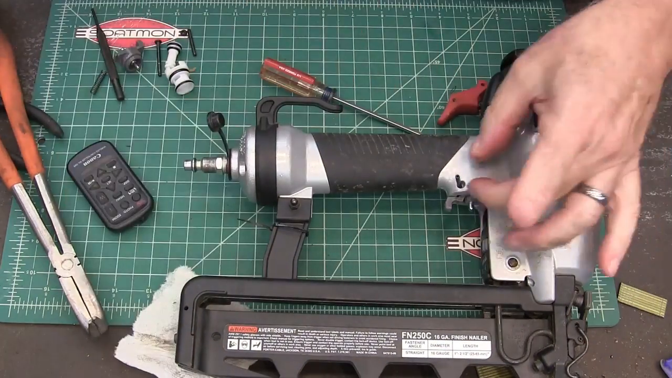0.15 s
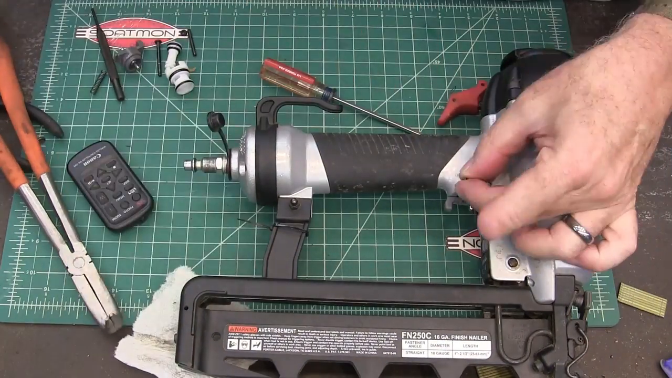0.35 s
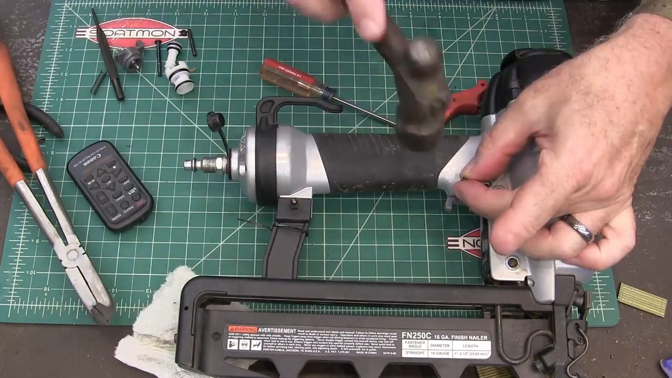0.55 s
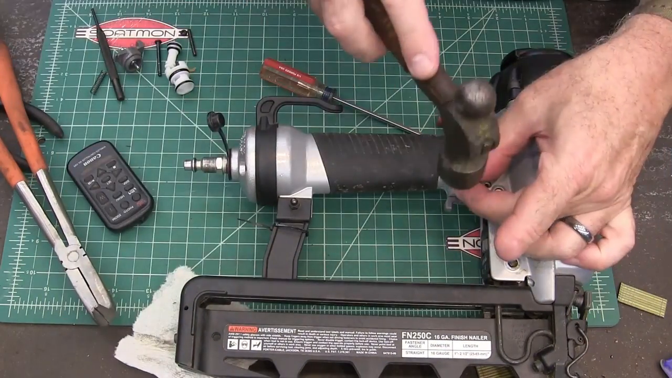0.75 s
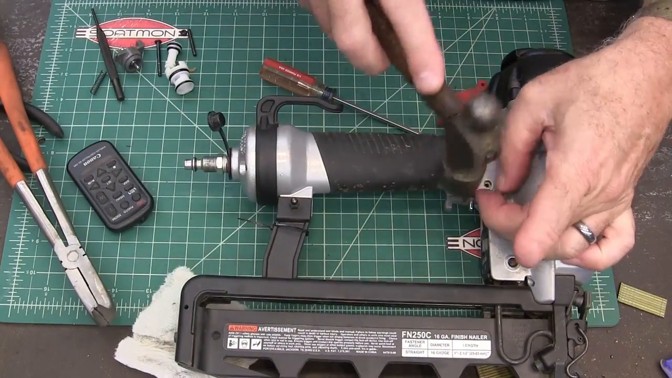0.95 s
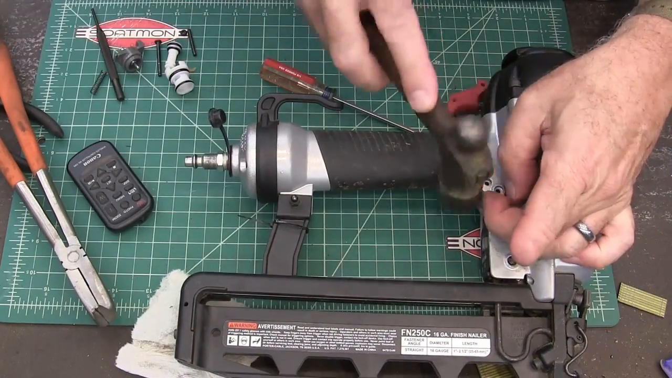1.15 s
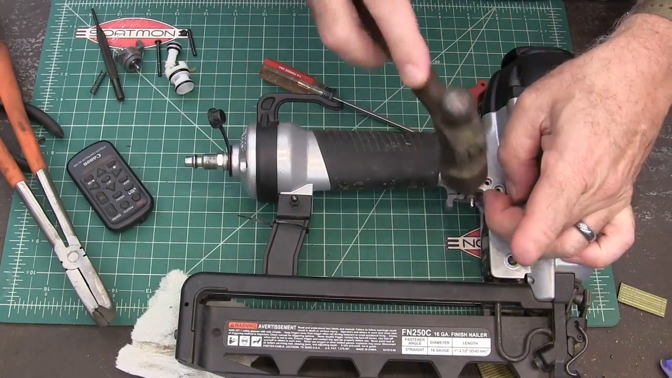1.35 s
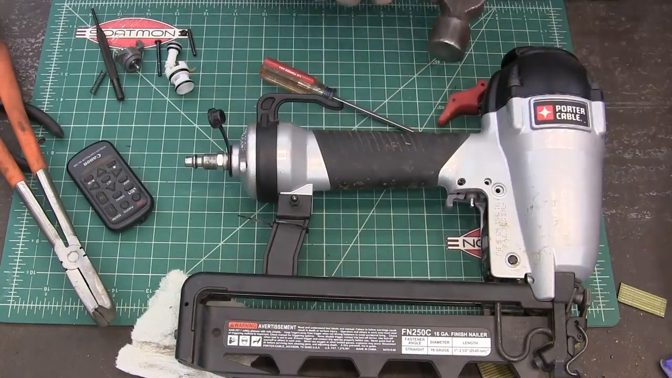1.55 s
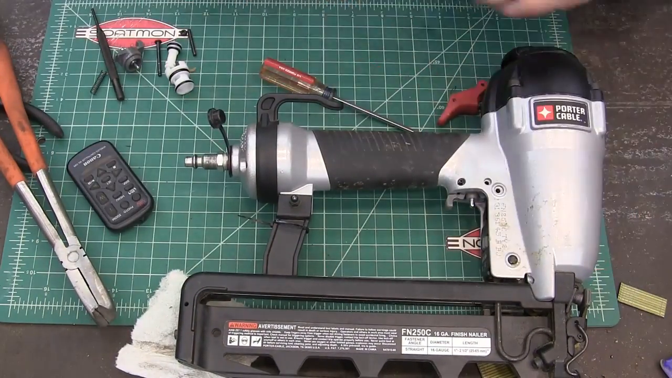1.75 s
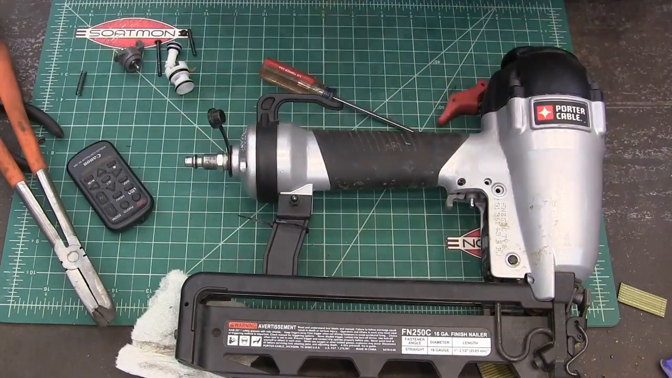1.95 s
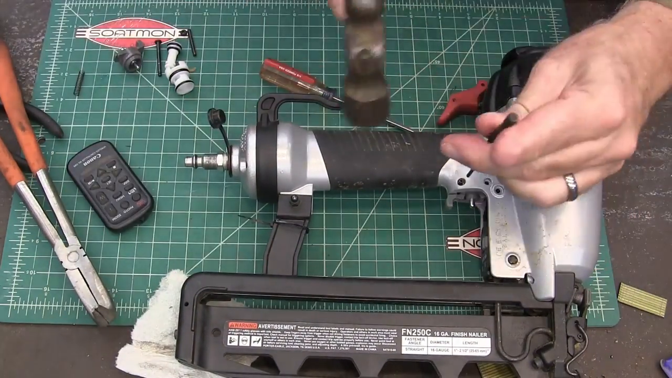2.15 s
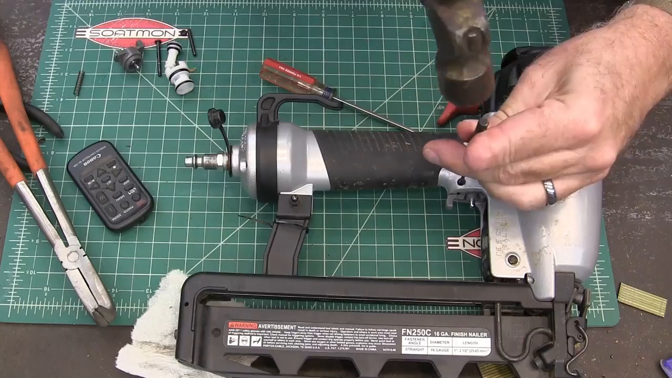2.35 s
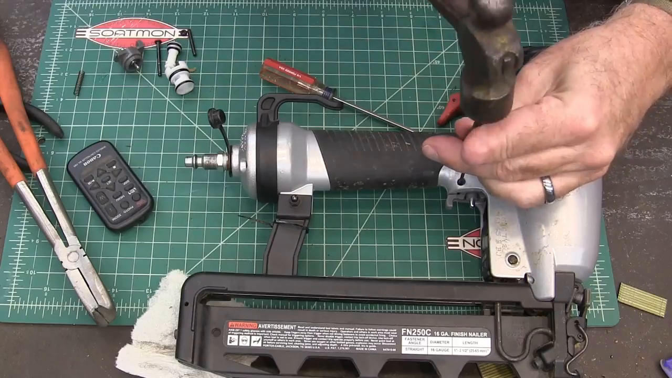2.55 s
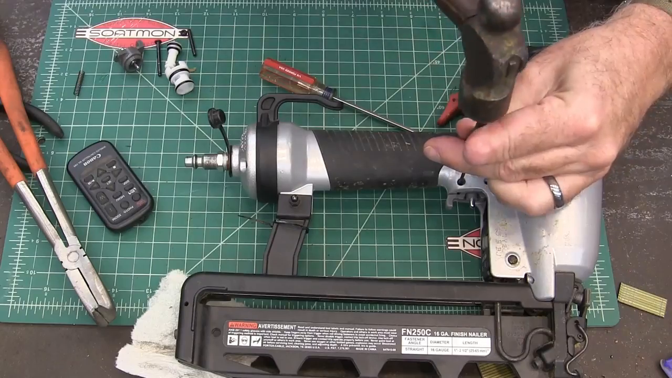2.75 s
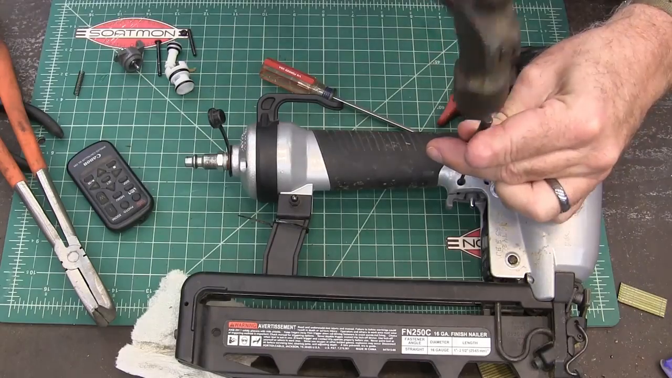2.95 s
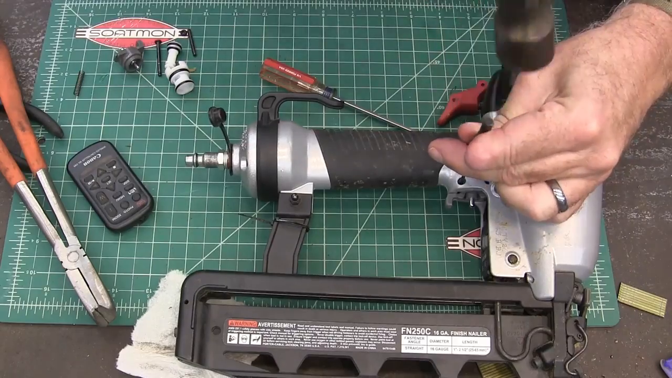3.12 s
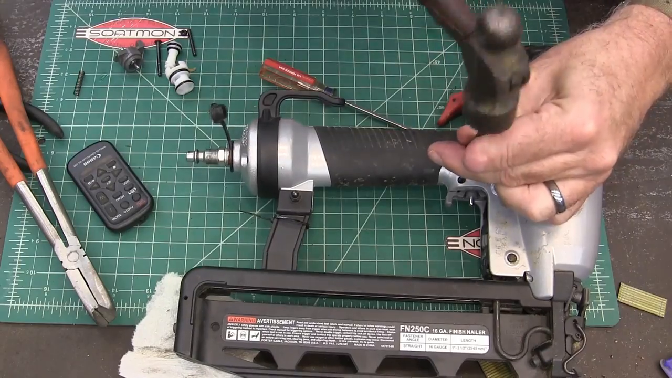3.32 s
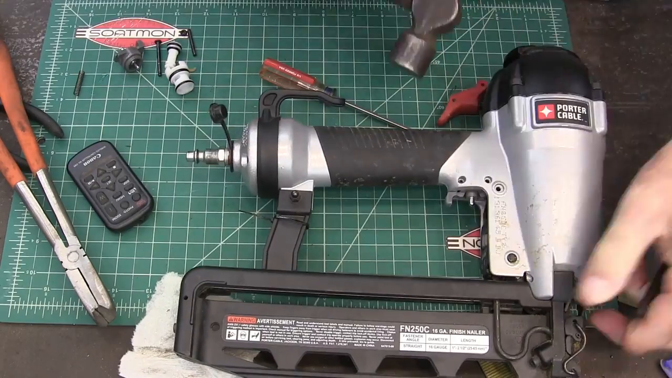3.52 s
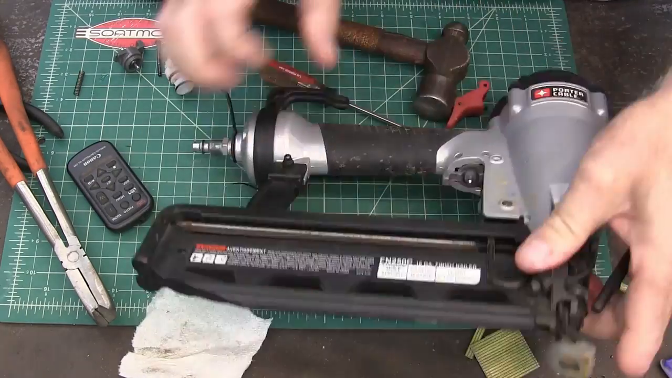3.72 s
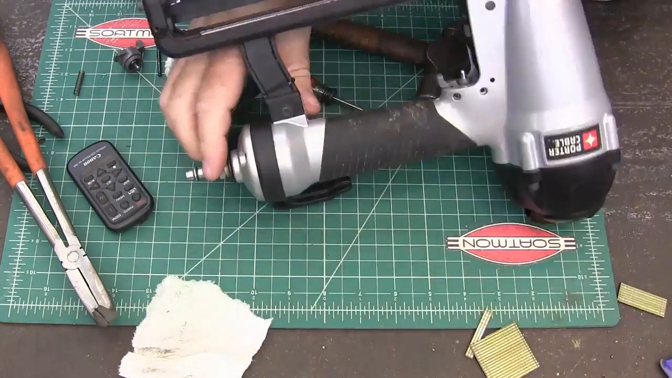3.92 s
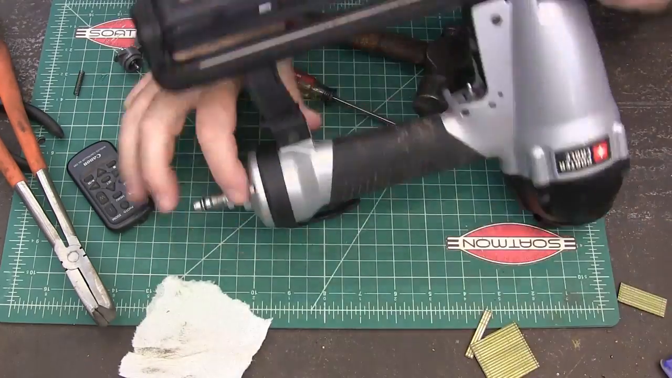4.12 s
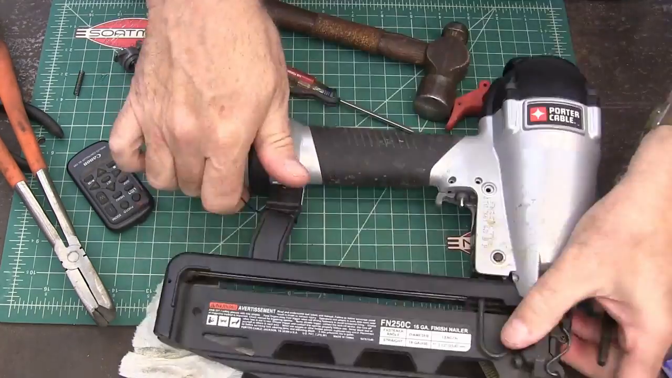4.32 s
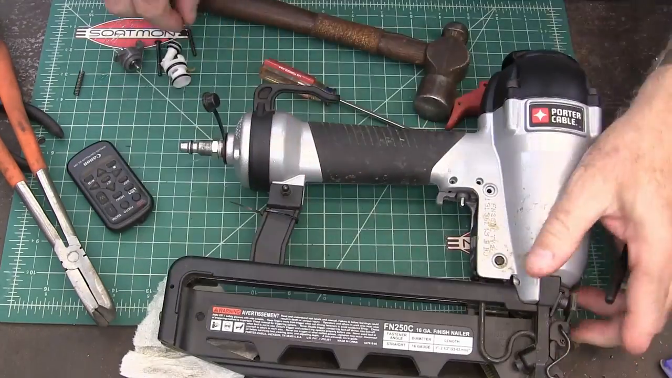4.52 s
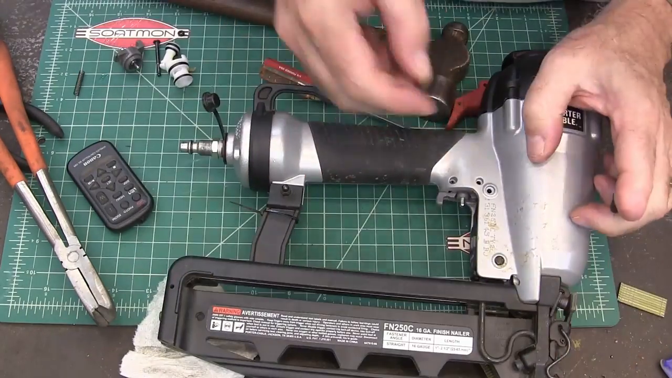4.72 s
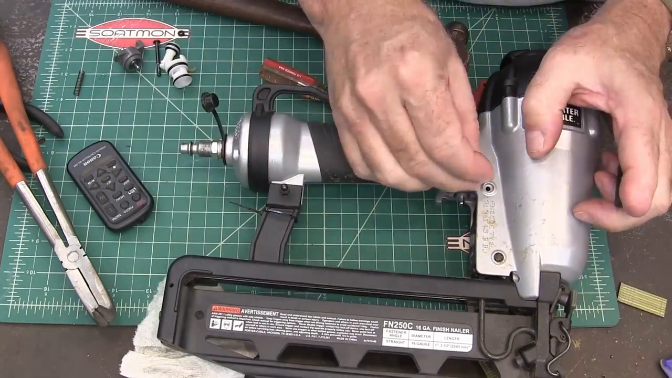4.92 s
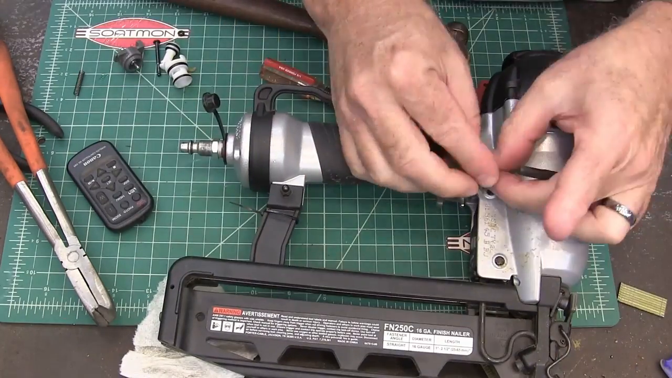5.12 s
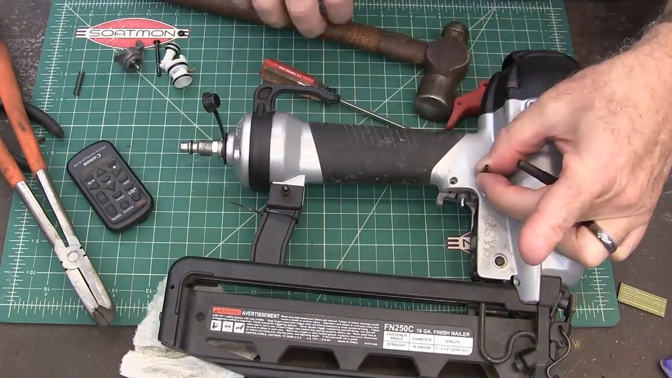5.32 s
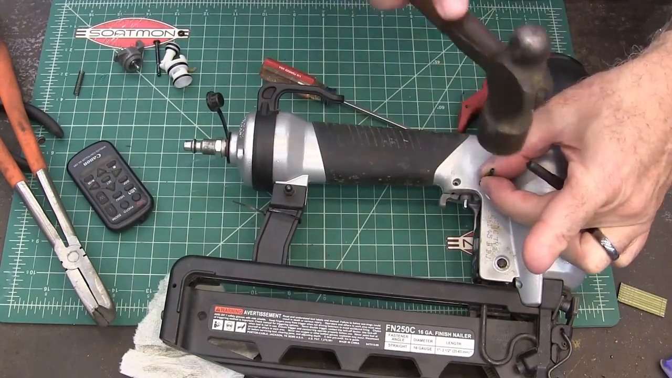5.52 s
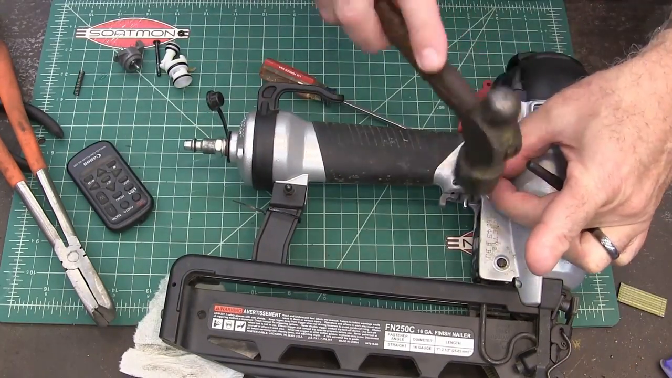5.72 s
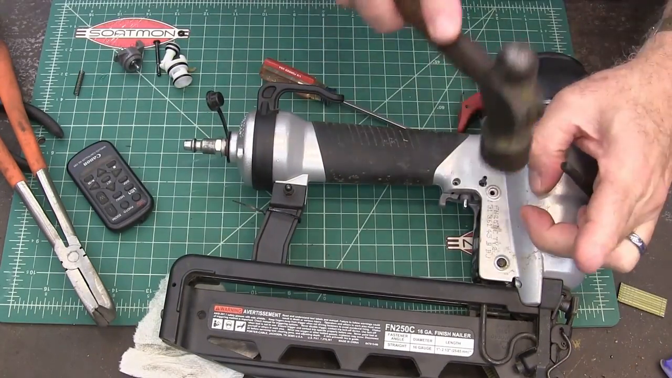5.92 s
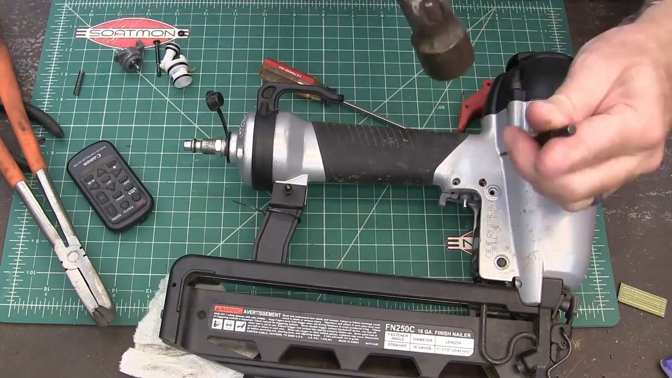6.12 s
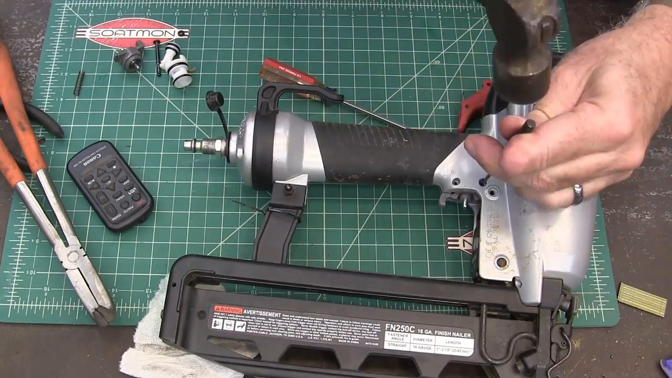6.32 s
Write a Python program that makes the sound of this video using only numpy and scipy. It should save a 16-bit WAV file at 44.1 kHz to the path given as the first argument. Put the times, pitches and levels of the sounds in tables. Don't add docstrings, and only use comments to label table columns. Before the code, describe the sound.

Close at a quiet workshop bench, pliers drag aside with a gritty rasp and thin steel jingle. A small hammer then taps a pin into a metal tool in fast bursts. Between bursts the tool is lifted with a heavy thump, turned and set down with knocks and faint scraping. More taps finish. The action is sped up, with blurred attacks and short tails.

```python
import sys
import numpy as np
from scipy import signal
from scipy.fft import rfft, irfft
from scipy.io import wavfile
from scipy.ndimage import uniform_filter1d, map_coordinates

SR = 44100
rng = np.random.default_rng(int(sys.argv[2]) if len(sys.argv) > 2 else 0)


def volts_from_decibels(level):
    exponent = np.asarray(level, float) / 20
    return 10 ** exponent


def store_wav(level_fs):
    pcm = np.round(np.clip(np.atleast_2d(level_fs), -1, 1) * 32767)
    wavfile.write(sys.argv[1], SR, pcm.T.astype(np.int16))


N = 281049
LEAD, LENGTH = 2048, 8192


def unit(x):
    return x / np.sqrt(np.mean(x ** 2) + 1e-20)


def along(points, hz):
    f, v = np.transpose(points)
    return np.interp(np.log(hz + 1), np.log(f + 1), v)


def hiss(spectrum, patchy_db, lo_hz=0, hi_hz=SR, size=5):
    hz, _, z = signal.stft(rng.standard_normal((2, N + 512)), SR, nperseg=512)
    field = uniform_filter1d(rng.standard_normal(z.shape[1:]), 4, 0)
    field = uniform_filter1d(field, size, 1)
    colour = volts_from_decibels(along(spectrum, hz)) * (hz >= lo_hz) * (hz < hi_hz)
    z = z * volts_from_decibels(patchy_db * unit(field)) * colour[:, None]
    return unit(signal.istft(z, nperseg=512)[1][:, :N])


def strokes(rows, swell_db):
    t, level = np.arange(N) / SR, 0
    for start, peak, end, *db in rows:
        edge = np.clip(np.minimum(t - start, end - t) / 0.0093, 0, 1)
        swell = np.interp(t, [start, peak, end], [-swell_db, 0, -swell_db])
        level = level + edge * volts_from_decibels(swell + np.c_[db])
    return level


def resonances(modes, hz):
    return 1 + sum((volts_from_decibels(db) - 1) * 1j * hz * w / (c * c - hz * hz + 1j * hz * w) for c, w, db in modes)


def smeared(rise_ms, t60_ms, tail_db, crack_db):
    # frequency in Hz, factor.
    lasting = [(100, 1.7), (400, 0.94), (2000, 0.93), (8000, 0.69), (14000, 0.35)]
    # frequency in Hz, t60 in s.
    room_t60 = [(100, 0.18), (500, 0.056), (3000, 0.086), (12000, .09)]
    frame, overlap = 256, 160
    noise = rng.standard_normal((2, LENGTH))
    hz, t, z = signal.stft(noise, SR, nperseg=frame, noverlap=overlap)
    ms, hz = 1000 * (t - LEAD / SR), hz[:, None]
    shift = uniform_filter1d(rng.standard_normal((len(hz), 1)), size=3, axis=0)
    late = ms + 0.25 * rise_ms * unit(shift)
    before, after = np.clip(-late, 0, None), np.clip(late, 0, None)
    rise = volts_from_decibels(-10.4 * (before / rise_ms) ** (1.1 + 0.026 * rise_ms))
    fall = volts_from_decibels(-12.4 * (5 * after / (t60_ms * along(lasting, hz))) ** 1.2)
    tail = volts_from_decibels(tail_db - 60 * after / (1000 * along(room_t60, hz)))
    z = z * rise * np.hypot(fall, tail)
    body = signal.istft(z, SR, nperseg=frame, noverlap=overlap)[1][:, :LENGTH]
    ms = 1000 * (np.arange(LENGTH) - LEAD) / SR
    return body + volts_from_decibels(crack_db - 8.54 * np.abs(ms)) * rng.standard_normal((2, LENGTH))


def contacts(events, parts, colour, ring, crack_db, tail_db, trim_db):
    # frequency in Hz, width in Hz, level in dB.
    body_modes = [(161, 18, 11), (275, 32, 9), (367.2, 9, 12), (486, 23, 5), (700, 130, 1), (846, 17, 3),
                  (1367, 250, 4), (1607, 15, -4), (1950, 490, 4.5), (2375, 250, 7.5), (3060, 60, 4.5),
                  (3860, 15, 10), (4540, 62, 3.5), (5570, 140, 5.5), (6770, 120, 0.5), (7060, 130, 1.5),
                  (7220, 44, -4), (10340, 27, 8), (11770, 250, 1.5)]
    part_width, damping_hz = 0.19, 35
    heavy_db, crack_loss = -23, 0.9
    reach_ms, cut_db_per_ms = 4, 4
    out, hz = np.zeros((2, N + LENGTH)), np.fft.rfftfreq(LENGTH, 1 / SR)
    low, high = 1 / (1 + (hz / 700) ** 4), 1 / (1 + (4500 / (hz + 1)) ** 6)
    ahead_ms = 1000 * (LEAD - np.arange(LENGTH)) / SR
    middle = (hz > 700) & (hz < 4500)
    region = 12 * np.log(1 + hz / 900)
    for s, db, thud_db, bright_db, rise_ms, t60_ms in events:
        own = [(c, part_width * c, min(g, 13)) for near, c, g in parts if abs(near - s) < 0.02]
        crack = crack_db - crack_loss * max(db - heavy_db, 0)
        shared, apart = rfft(smeared(max(rise_ms, 2), max(t60_ms, 20), tail_db, crack))
        pair = shared + 0.2 * apart * [[1], [-1]]
        power = np.abs(pair) ** 2
        pair = pair * np.sqrt(uniform_filter1d(power, size=240) / uniform_filter1d(power, size=40))
        wander = [map_coordinates(knots, [region]) for knots in rng.standard_normal((2, 60))]
        turn = np.exp(1.8j * np.array(wander))
        strength_db = np.array(body_modes)[:, 2] + rng.normal(0, 3, len(body_modes))
        strength_db = np.clip(ring * strength_db, 0, 7)
        body = [(c, 1.1 * w + damping_hz, g) for (c, w, _), g in zip(body_modes, strength_db)]
        shape = volts_from_decibels(along(colour, hz)) * resonances(body, hz) * np.abs(resonances(own, hz))
        shape = shape / np.sqrt(2 * np.sum(np.abs(shape[middle]) ** 2) / LENGTH)
        fine = uniform_filter1d(rng.standard_normal(len(hz)), size=12)
        fine = volts_from_decibels(2.69 * unit(uniform_filter1d(fine, size=12)))
        tilt = fine * volts_from_decibels(thud_db * low + bright_db * high)
        start = round(s * SR)
        onset = volts_from_decibels(-cut_db_per_ms * np.clip(ahead_ms - rise_ms - reach_ms, 0, None))
        blow = onset * irfft(pair * shape * tilt * turn, LENGTH)
        out[:, start:start + LENGTH] += volts_from_decibels(db + trim_db) * blow
    return out[:, LEAD:LEAD + N]


def air():
    # frequency in Hz, density in dB per Hz.
    air_colour = [(25, 6), (45, -16), (70, -23), (120, -0.5), (250, 1), (500, 0.5), (1270, -5), (2500, -8),
                  (5000, -12), (9000, -20), (15600, -24)]
    return volts_from_decibels(-63.5) * hiss(air_colour, patchy_db=2.5)


def ringing():
    # start in seconds, frequency in Hz, level in dB, t60 in s.
    rings = [(1.37, 167, -44, .5), (1.37, 651, -48, .7), (1.37, 1350, -55, .4), (6.02, 160, -55, .5),
             (3.73, 1480, -43, .16), (.905, 175, -46, .4), (1.02, 170, -46, .4), (1.11, 160, -44, .35),
             (2.585, 330, -33, .11), (3.37, 160, -56, .5)]
    t, out = np.arange(N) / SR, 0
    for s, hz, db, t60 in rings:
        swell = volts_from_decibels(-60 * np.clip(t - s, 0, 3) / t60) * np.clip((t - s) / 0.012, 0, 1)
        phase_turns = rng.random(2)[:, None] / 4
        out = out + volts_from_decibels(db) * swell * np.sin(2 * np.pi * (hz * t + phase_turns))
    return out


def sliding():
    # start, peak and end in seconds, scrape level in dB, rasp level in dB.
    slides = [(1.55, 1.63, 1.8, -78.5, -83.5), (1.85, 2.06, 2.2, -65.5, -71.5), (3.6, 3.85, 3.95, -57, -64),
              (4.0, 4.364, 4.13, -65.5, -72), (4.58, 4.68, 4.9, -67.5, -69.5),
              (5.2, 5.38, 5.35, -65.5, -72.5)]
    # frequency in Hz, density in dB per Hz.
    scrape_colour = [(100, -22), (300, -13.5), (800, -26), (2000, 7), (4500, -1.5)]
    rasp_colour = [(4500, 6), (6500, 5.5), (9500, 2.5), (13000, -25), (15500, -14)]
    dull, bright = strokes(slides, swell_db=9)
    scrape = dull * hiss(scrape_colour, patchy_db=2.5, hi_hz=4500)
    return scrape + bright * hiss(rasp_colour, patchy_db=3.5, lo_hz=4500)


def pliers():
    # peak and end in seconds, scrape level in dB, jingle level in dB.
    pulls = [
        (0.3, 0.359, -40, -42.5),
        (0.363, 0.414, -46, -64.5),
        (0.463, 0.501, -39, -47),
        (0.501, 0.554, -47, -45),
    ]
    # frequency in Hz, density in dB per Hz.
    steel_colour = [(88, -39), (150, -15.5), (767, -4), (2070, -11.5), (2610, -10), (2870, -11.5),
                    (7160, -18.5), (10400, -13.5), (13300, -18.5), (15600, -30)]
    pull_s = 0.032
    scrape, jingle = strokes([(row[0] - pull_s, *row) for row in pulls], swell_db=11.5)
    catches = rng.standard_normal(N // 100 + 4)
    grit = unit(volts_from_decibels(3.5 * map_coordinates(catches, [np.arange(N) / 100])))
    rasp = hiss(steel_colour, patchy_db=2.5, hi_hz=8000)
    return grit * scrape * rasp + jingle * hiss(steel_colour, patchy_db=6.5, lo_hz=7900, size=22)


def handling():
    # peak in seconds, level in dB, thud in dB, brightness in dB, t60 in ms.
    clicks = [(0.274, -27.5, -4, -29, 93), (0.365, -36.5, -14, 6.5, 51), (0.451, -30.5, -19.5, 5, 154),
              (0.502, -41, -21, 2, 240), (1.585, -49, -6, 3, 250), (3.477, -43.5, -14, 11.5, 75),
              (3.667, -30.5, 0.5, -3.5, 73), (3.724, -32.5, -18, 2, 26), (3.733, -37.5, -16, 5, 17),
              (3.75, -46, -1, -55, 500), (3.986, -67, 13, -5, 60), (4.234, -42, -17, -3.7, 165),
              (4.383, -48.5, 7.5, 9, 114), (4.618, -50.5, -24.5, -14, 40), (5.08, -36, -0.5, -12.5, 54),
              (5.1, -48.5, 8.5, -27.5, 100), (5.448, -49, -7.5, -5, 190)]
    bumps = [(0.02, -53, -22, -6.5, 86), (0.23, -42, 2, -21, 114), (0.342, -36.5, -6.5, -13, 34),
             (0.467, -38.5, -9, 9, 78), (0.527, -33, -19, -11, 143), (3.635, -55.5, -21, 8, 150),
             (3.691, -28, 0, -0.5, 51), (3.727, -15.5, -3, -47, 97), (3.872, -47.5, -6, 3, 165),
             (3.967, -54, -13, -14, 110), (4.036, -43.5, -15, 3.5, 76), (4.067, -44, -10, 2.5, 74),
             (4.18, -53, -3, -1.5, 105), (4.415, -61, 4, 12.5, 61), (4.51, -30.5, -3, -1, 130),
             (4.633, -44.5, -46, -6, 66), (4.833, -60.5, 2, -19, 110), (5.503, -23, -15, -4, 148),
             (6.17, -58, -5.5, -8.5, 130), (6.338, -59, -2, 0.5, 55)]
    brushes = [(1.938, -59.5, -5.5, -10.5, 240), (2.195, -59, -20, 15.5, 110), (2.952, -68, 15, -14.5, 79),
               (3.845, -34.5, -1.5, 2, 31), (4.311, -47.5, 7.2, 1.5, 186), (4.803, -64.5, 8.5, -7, 130),
               (5.375, -64, 3, -10, 220)]
    # time in seconds, frequency in Hz.
    touched = [(0.23, 373), (0.274, 820), (0.365, 740), (0.365, 4600), (0.451, 750), (0.451, 2190),
               (3.691, 370), (3.691, 2300), (3.727, 1010), (3.727, 734), (3.845, 1970), (3.845, 2930),
               (3.872, 6500), (4.036, 537), (4.067, 3020), (4.067, 6180), (4.18, 6030), (4.234, 7600),
               (4.311, 162), (4.311, 2860), (4.383, 244), (4.383, 1670), (4.512, 2030), (4.512, 604),
               (4.633, 1950), (5.08, 5210), (5.448, 2460), (5.5, 3100)]
    # frequency in Hz, density in dB per Hz.
    knock_colour = [(25, -17), (60, 0.5), (150, 1.5), (500, -2), (1300, -1), (2500, -10), (4500, -5.5),
                    (7800, -11.5), (13000, -21), (15000, -47.5)]
    parts = [(s, hz, 16) for s, hz in touched]

    def touch(rows, rise_ms, crack_db):
        events = [(*row, rise_ms, t60) for *row, t60 in rows]
        return contacts(events, parts, knock_colour, 0.9, crack_db, tail_db=-19.5, trim_db=-5.0)

    hard = touch(clicks, rise_ms=6.5, crack_db=11) + touch(bumps, rise_ms=12.3, crack_db=9)
    return hard + touch(brushes, rise_ms=27, crack_db=4.5)


def hammer():
    # peak in seconds, level in dB, thud in dB, brightness in dB, t60 in ms.
    clean = [(0.838, -35, -1, -8.5, 112), (0.901, -28, 1, -3.5, 96), (1.018, -29, 2.5, -0.5, 128),
             (1.114, -18.5, -11.5, -1, 107), (2.58, -23.5, -3.5, -9.5, 70), (2.735, -36, 1, -18, 117),
             (2.838, -27.5, -5.5, -18, 61), (5.618, -36.5, 10.5, -8, 78), (5.857, -24, -3.5, -1, 173)]
    # peak in seconds, level, thud, brightness in dB, rise in ms.
    drawn = [(1.21, -23, -3.5, -2.1, 16), (1.294, -24.5, -5.5, -6, 16), (3.13, -22.5, 1, -6, 16.9),
             (3.214, -22.5, 0, -6.5, 16), (3.285, -23, 4.5, -2.5, 15), (3.366, -22.5, -0.5, -2.6, 20.5),
             (5.705, -24, 0.5, -5, 13.5), (5.768, -24, -2.5, -0.7, 10)]
    bounced = [(1.369, -21, -1.5, -8.5, 181), (3.024, -16.5, -3.5, 1.5, 62), (5.941, -26, 0, 6, 144),
               (6.016, -22.5, -8.5, 1, 94)]
    # time in seconds, frequency in Hz, level in dB.
    struck = [(0.839, 386, 17), (1.019, 324, 5), (1.019, 6950, 3), (1.114, 394, 9.5), (1.37, 450, 15),
              (1.37, 700, 10), (2.579, 1210, 13), (2.579, 394, 20), (2.579, 5500, 10), (2.733, 368, 14.5),
              (2.733, 5640, 13.5), (2.837, 380, 16.5), (2.837, 4700, 11), (3.023, 516, 12), (3.279, 450, 0),
              (3.205, 487, 12), (3.023, 1660, 8), (5.948, 1950, 12), (3.367, 420, 9), (5.617, 11800, 22),
              (5.617, 1100, 12), (5.704, 265, 10.5), (0.902, 7800, -3), (0.839, 7600, 7.5),
              (5.704, 7300, 6.5), (5.767, 352, 9.5), (5.767, 1320, 6.5), (5.859, 480, 10), (6.017, 352, 16),
              (6.017, 1320, 12)]
    # frequency in Hz, density in dB per Hz.
    blow_colour = [(25, -28.5), (60, -7), (150, 0.5), (500, -0.5), (1300, -3.5), (2500, -8.5), (4500, -8.5),
                   (7800, -5), (9000, -13), (13000, -15.5), (15000, -42)]

    def steel(events, crack_db):
        return contacts(events, struck, blow_colour, 0.82, crack_db, tail_db=-26.5, trim_db=-2.5)

    blows = [(s, db, thud, bright, 10.6 - 1 * s, t60) for s, db, thud, bright, t60 in clean]
    swells = [(*row, 105) for row in drawn]
    bounces = [(*row, 6.5, t60) for *row, t60 in bounced]
    # 1.2 ms rise, 180 ms t60
    ticks = [(s - 0.99 * rise_ms / 1000, db - 8, thud, bright + 4.5, 1.2, 180)
             for s, db, thud, bright, rise_ms in drawn]
    # 2.8 ms rise, 97 ms t60
    rebounds = [(s + 0.013, db - 3, thud, bright - 3.5, 2.8, 97) for s, db, thud, bright, _ in bounced]
    main = steel(blows, crack_db=10.5) + steel(swells, crack_db=-2.5) + steel(bounces, crack_db=14)
    return main + steel(ticks + rebounds, crack_db=0.5)


def scene():
    return air() + ringing() + sliding() + pliers() + handling() + hammer()


def top_cut(x):
    return signal.sosfilt(signal.butter(12, 15730, fs=SR, output="sos"), x)


def record(dry):
    ceiling = 0.62
    mix = dry / (1 + np.abs(dry / ceiling) ** 4) ** 0.18
    return top_cut(mix)


dry = scene()
out = record(dry)
store_wav(out)
```